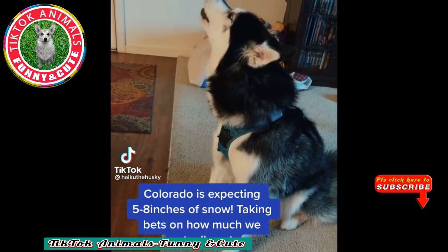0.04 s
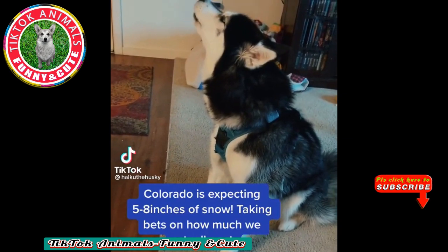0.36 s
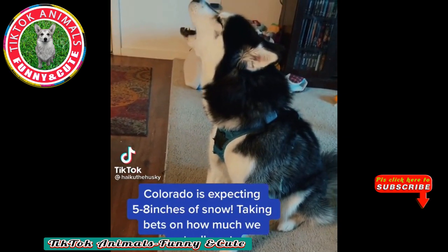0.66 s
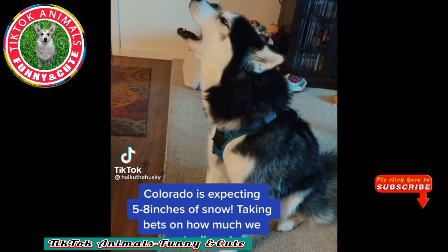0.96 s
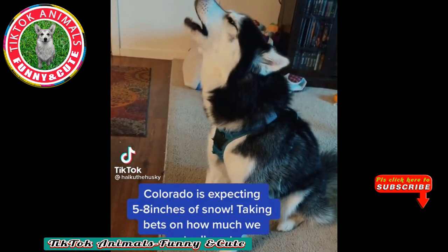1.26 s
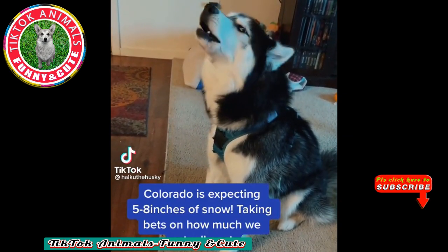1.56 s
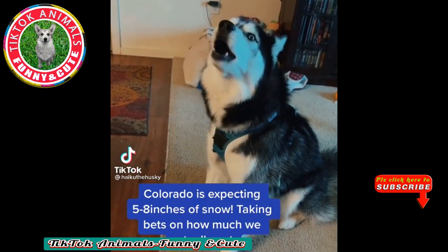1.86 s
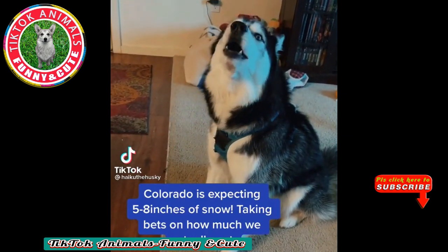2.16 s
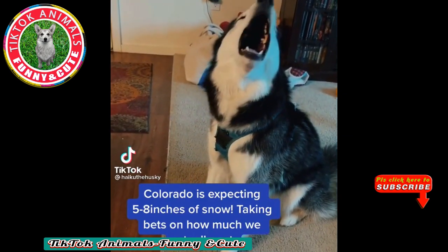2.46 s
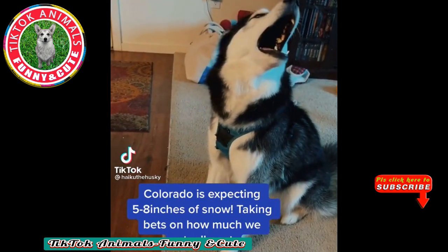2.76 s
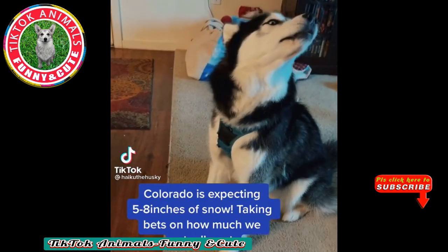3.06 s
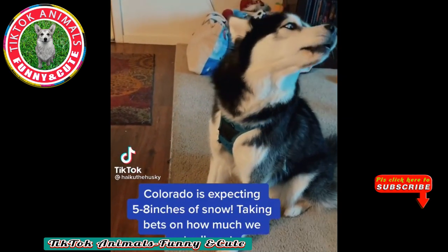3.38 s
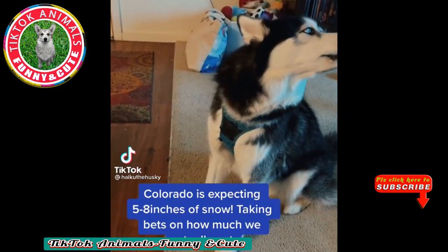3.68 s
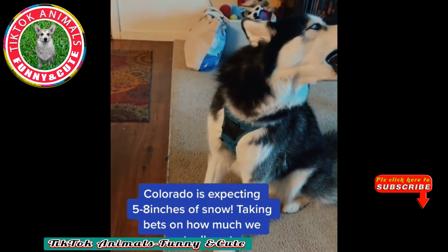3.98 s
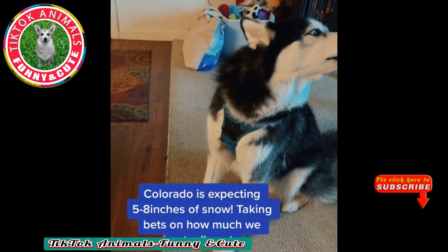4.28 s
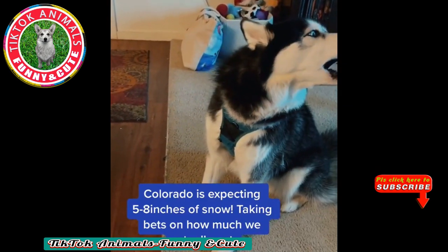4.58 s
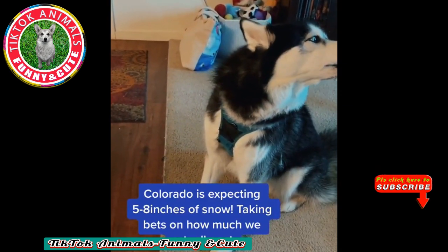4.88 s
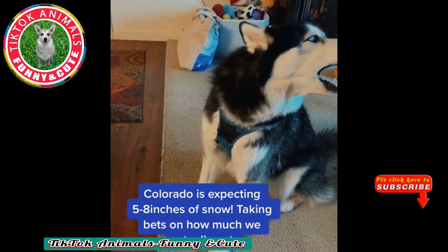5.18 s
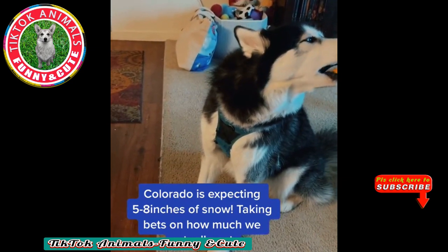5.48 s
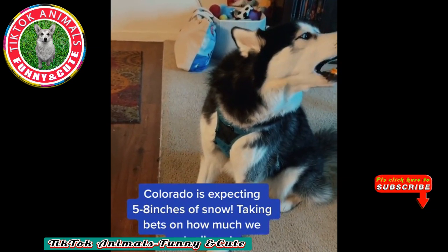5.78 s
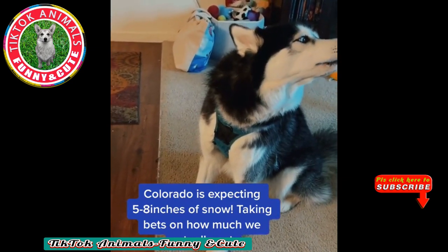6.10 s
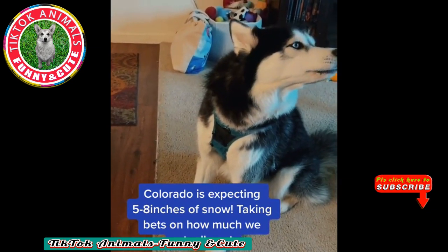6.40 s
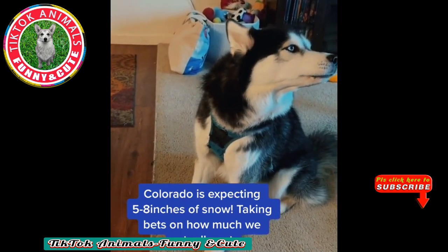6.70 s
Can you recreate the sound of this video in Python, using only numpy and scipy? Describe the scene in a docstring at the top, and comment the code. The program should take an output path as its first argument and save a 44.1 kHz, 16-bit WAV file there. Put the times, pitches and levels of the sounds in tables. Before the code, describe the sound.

A husky howls close to the microphone in a carpeted room, with a short echo and a faint low rumble throughout. It starts right away with a few short, rounded notes that slur together, then opens into a loud, higher "aa" at about 1 second, turning raspy near 1.4. A lower, more closed note follows and swells around 2 seconds into the longest howl, which rises, then falls and fades by about 3 seconds. From 3.2 seconds come softer, lower notes, climbing again with a voice crack near 3.9. The howling continues in wavering, partly nasal "woo-aa" syllables, with a brief hoarse crack at about 5.1 seconds and another small one near 5.8. A last note slides downward and ends at about 6.2 seconds, leaving only the quiet room rumble.

```python
"""A husky howls close by: one long run of wavering notes over the faint rumble of a carpeted room.
Its vocal folds make a clean stack of harmonics; jaw and lips move two resonances from a closed "oo"
to a wide "aa", and part of the sound leaves through the nose. The voice rasps where it is pushed,
and the walls make each gliding harmonic swell and fade."""
import sys
import numpy as np
from scipy import signal
from scipy.fft import rfft, irfft
from scipy.io import wavfile
from scipy.ndimage import uniform_filter1d

SR = 44100
rng = np.random.default_rng(int(sys.argv[2]) if len(sys.argv) > 2 else 0)


def master(y):
    """Save y as 16-bit WAV."""
    cut = np.clip(np.atleast_2d(y).T, -1, 1)
    pcm = np.round(cut * 32767)  # scale
    wavfile.write(sys.argv[1], SR, pcm.astype(np.int16))


N = 297490
TIME_S = np.arange(N) / SR
SIDE_SIGN = np.array([[1], [-1]])  # left, right

# room rumble spectrum: (frequency [Hz], relative density [dB])
RUMBLE_SPECTRUM = [(25, -28.5), (55, 3.5), (85, -10), (120, -2.5), (250, -13), (1000, -25), (8000, -67)]
# room rumble envelope: (time [s], level [dB])
RUMBLE_LEVEL = [(0, -54), (2.35, -57.5), (2.6, -62.5), (6.75, -60)]
# throat and muzzle response: (frequency [Hz], gain [dB])
THROAT_RESPONSE = [(540, 2.8), (610, -4.0), (850, -2.6), (1600, 0.4), (2000, 6.2), (2350, 0.7),
                   (2700, -10.2), (3300, -25.5), (4200, -8), (4850, -13), (5500, -3), (7200, 6.9),
                   (8400, -4.5), (9100, -19.8), (9800, 7.1), (10700, 8.4), (12500, -20.5)]
# uneven fold beating: (start [s], length [s], added roughness [0-1])
FOLD_RASPS = [(.585, 0.047, 0.18), (1.343, .12, 0.42), (1.97, .12, 0.18), (2.345, 0.089, .08),
              (3.867, .2, .15), (5.076, 0.047, 0.7), (5.474, 0.052, 0), (5.773, 0.017, .25)]
# voice cracks: (time [s], pitch drop [fraction])
VOICE_CRACKS = [(0.6, 0.033), (3.865, 0.068), (5.091, 0.074), (5.777, 0.027)]
# howl notes: (start [s], max length [s], scoop [s], fall [s], first pitch [Hz], held pitch [Hz],
# last pitch [Hz], glide [Hz/s], base level [dB], swell over note [dB], jaw resonance [Hz],
# lip resonance [Hz], effort tilt [dB/oct], nasal share [0-1], nasal change over note [share])
HOWL_NOTES = [(0.0, 0.12, 0.035, .043, 606, 533.7, 552.3, -92, -33, -9.5, 916, 1044, 1, 0.55, 0),
              (0.139, 0.22, 0.075, 0.14, 495, 556, 458.3, 124, -22, 0.5, 704, 864, -4.5, .7, 0.085),
              (.485, 0.093, 0.084, 0.056, 458.4, 513.6, 548.3, 381, -20.5, 0.5, 778, 1167, -11.5, 0.76, 0),
              (0.606, 0.25, 0.045, 0.14, 494.5, 503, 454.8, 71, -18, -5.8, 907, 1014, 2, 0.17, -0.025),
              (0.943, .418, 0.095, 0.1, 492.4, 587.1, 549.7, 53.5, -15.5, 1.8, 1105, 1342, 0.5, 0.37, 0.047),
              (1.574, .327, .135, .075, 440, 484.1, 482.8, -410, -21, -1, 713, 940, -7, 0.7, 0.036),
              (1.93, 0.36, .081, 0.093, 451.4, 481.7, 476, 157, -19, 8, 742.2, 1508, 3, 0.51, 0.48),
              (2.34, .7, 0.17, .165, 550.5, 602.1, 495.5, 64, -19, -12, 1258, 1782, 3.5, 0.36, -0.34),
              (3.243, 0.23, .012, 0.18, 426, 401.2, 392.8, -150, -28, 0.5, 851, 967, -9, 0.8, -0.55),
              (3.509, 0.21, 0.021, 0.048, 410, 416.1, 392.6, -53.5, -23.5, 0, 910, 1060, -6.5, 0.73, 0.32),
              (3.762, 0.27, 0.033, 0.079, 403, 474.9, 516, 209.5, -25.5, 0.5, 719.4, 1447, 2.5, 0.69, -0.16),
              (4.051, .318, 0.062, 0.092, 546.3, 570.2, 479.3, 72, -21, -1.5, 844.5, 1680, 0.8, 0.5, 0.057),
              (4.421, 0.5, 0.1, 0.092, 480, 512.7, 430.6, -200, -26.5, -4.5, 705, 1520, 3, .15, .6),
              (4.959, 0.11, 0.1, .014, 423.5, 459, 457.5, -110, -28, 3.5, 600, 1321, 3.3, 0.43, 0),
              (5.115, .358, .037, 0.026, 466.7, 480.7, 504.4, 121, -19.5, 0, 1100, 1485, 0.8, 1, 0.87),
              (5.485, 0.23, 0.014, 0.11, 574, 573, 554.3, 65.5, -22.5, -10, 691.5, 1513, 3.5, 0.18, 0.31),
              (5.757, 0.36, 0.015, 0.082, 586, 520, 433.4, -250, -26, -4.5, 813, 1468, 3, 0, 0.65)]
# "woo" jaw dips: (time [s], half length [s], closure [0-1], swell [dB])
WOO_DIPS = [(.815, 0.022, 0.3, 4), (1.869, .025, 0, 4.5), (2.29, 0.023, 0.6, -1.5), (2.995, 0.037, 0, 2),
            (3.79, 0.026, 0.58, 6), (4.317, 0.014, 0.6, 5), (4.492, .025, 0.64, 4.5),
            (4.945, 0.062, 0.37, 5.5), (5.714, 0.032, 0.93, 12), (6.135, 0.015, 0.49, 3.5)]
# phase between two microphone ports: (frequency [Hz], left lead [rad])
PORT_LEAD = [(0, 0), (690, -0.1), (950, -0.5), (2580, 0.8), (3100, -0.1), (3790, 1.3), (4390, 1.6),
             (5000, 3.7), (5250, 5.2), (5680, 6.2), (6120, 6.4), (6720, 6.7), (6980, 6.3), (11800, 6.2)]

SHUT_JAW_HZ, SHUT_LIP_HZ, SHUT_TILT_DB_OCT = 490, 850, -7  # mouth closed to "oo"


def undb(db):
    """Decibels to gain."""
    return np.exp(np.asarray(db) * np.log(10) / 20)


def unit_rms(x):
    """Scale to rms 1."""
    return x / np.sqrt(np.mean(x ** 2))


def curves(table):
    """Time table columns at every sample, corners rounded."""
    time_s, *columns = np.transpose(table)
    return [uniform_filter1d(np.interp(TIME_S, time_s, column), size=500) for column in columns]


def spectrum_gain(hz, spectrum):
    """Gain of a (frequency [Hz], gain [dB]) table at hz."""
    points_hz, db = np.transpose(spectrum)
    return undb(np.interp(np.log(hz + 1), np.log(points_hz), db))


def shaped_noise(spectrum):
    """Noise of the given spectrum, rms 1."""
    hz = np.arange(N // 2 + 1) * SR / N
    return unit_rms(irfft(rfft(rng.standard_normal(N)) * spectrum_gain(hz, spectrum), N))


def lowpass(x, cutoff_hz):
    """Second-order low-pass."""
    return signal.sosfilt(signal.butter(2, cutoff_hz, fs=SR, output="sos"), x)


def wobble(rate_hz):
    """Random motion up to rate_hz, rms 1."""
    return unit_rms(lowpass(rng.standard_normal(N), rate_hz))


def flutter(rate_hz):
    """Random values at rate_hz, joined linearly."""
    steps = rng.standard_normal(4096)
    return np.interp(TIME_S * rate_hz, np.arange(len(steps)), steps)


def bump(at_s, half_s):
    """Gaussian pulse, peak 1."""
    return np.exp(-.5 * ((TIME_S - at_s) / half_s) ** 2)


def settle(progress):
    """Ease from 1 to 0."""
    return 1 - np.sin(np.pi / 2 * np.clip(progress, 0, 1))


def resonance(hz, centre_hz, width_hz):
    """Gain of one resonance, peak 1."""
    return 1 / np.sqrt(1 + (2 * (hz - centre_hz) / width_hz) ** 2)


def room_rumble(side_db=-23):
    """Low indoor rumble, nearly mono."""
    mid, side = shaped_noise(RUMBLE_SPECTRUM), shaped_noise(RUMBLE_SPECTRUM)
    level_db, = curves(RUMBLE_LEVEL)
    return undb(level_db) * (mid + undb(side_db) * side * SIDE_SIGN)


def room_reverb(direct, t60_low_s=0.4, t60_high_s=0.35, tail_db=-5.5, side_db=-7.5, build_s=0.0006):
    """Direct sound plus a diffuse stereo tail; carpet and furniture absorb treble first."""
    t = np.arange(int(.6 * SR)) / SR
    noise = rng.standard_normal((2, len(t)))
    low = lowpass(noise, cutoff_hz=3000)
    tail = low * undb(-60 * t / t60_low_s) + (noise - low) * undb(-60 * t / t60_high_s)
    tail *= 1 - np.exp(-t / build_s)
    mid, side = tail / np.sqrt(np.sum(tail ** 2, axis=1, keepdims=True))
    response = undb(tail_db) * (mid + undb(side_db) * side * SIDE_SIGN)
    return direct + signal.fftconvolve(direct[None], response, axes=1)[:, :N]


def fold_roughness(calm=0.13):
    """Uneven fold beating: slight throughout, stronger in rasps."""
    rasps = sum(amount * ((TIME_S >= start_s) & (TIME_S < start_s + length_s))
                for start_s, length_s, amount in FOLD_RASPS)
    return calm + uniform_filter1d(rasps, size=900)


def voice_cracks(half_s=0.0053):
    """Fractional pitch drop as the folds slip between registers."""
    return sum(drop * bump(at_s, half_s) for at_s, drop in VOICE_CRACKS)


def fold_harmonic(k, phase_rad, roughness):
    """Harmonic k of the folds: low ones are clean, high ones flicker and turn hoarse."""
    fray_rad = 2.1 * min(k / 13, 1) ** 2 * np.sqrt(roughness)
    flicker_db = 5.5 * np.clip(k / 8, .6, 1) ** 3
    tone = np.sin(k * phase_rad + fray_rad * flutter(rate_hz=120))
    return tone * undb(flicker_db * flutter(rate_hz=22))


def nose_db(hz, notch_db=-24, peak_db=20.5):
    """The open nasal passage absorbs one band and rings in the next."""
    notch = resonance(hz, centre_hz=1890, width_hz=530) ** 2
    peak = resonance(hz, centre_hz=2765, width_hz=700) ** 2
    return notch_db * notch + peak_db * peak


def jaw_dips():
    """Brief jaw closures and their "woo" swells."""
    closure = sum(depth * bump(at_s, half_s) for at_s, half_s, depth, _ in WOO_DIPS)
    swell_db = sum(db * bump(at_s, half_s) for at_s, half_s, _, db in WOO_DIPS)
    return np.clip(closure, 0, 1), swell_db


def note_contour(row, next_start_s, slur_s=.005, shutting_sag=0.26, boom_db=1.5, shut_nasal=0.99):
    """One note: scoop, gliding hold, fall. The mouth shuts as pitch sags below the hold."""
    (start_s, length_s, scoop_s, fall_s, first_hz, held_hz, last_hz, glide_hz_per_s,
     level_db, swell_db, jaw_hz, lip_hz, tilt_db_oct, nasal, nasal_change) = row
    length_s = min(length_s, next_start_s - start_s - slur_s)
    t = np.linspace(0, length_s, 60)
    ramp = t / length_s - .5
    glide_hz = held_hz + glide_hz_per_s * (t - length_s / 2)
    scoop_hz = (first_hz - glide_hz) * settle(t / scoop_s)
    fall_hz = (last_hz - glide_hz) * settle((length_s - t) / fall_s)
    pitch_hz = glide_hz + scoop_hz + fall_hz
    shut = np.tanh(np.maximum(1 - pitch_hz / glide_hz, 0) / shutting_sag)
    tuning = glide_hz / held_hz  # open mouth tracks the glide
    return np.column_stack([start_s + t, pitch_hz,
                            level_db + swell_db * ramp + shut * boom_db,
                            (1 - shut) * jaw_hz * tuning + shut * SHUT_JAW_HZ,
                            (1 - shut) * lip_hz * tuning + shut * SHUT_LIP_HZ,
                            (1 - shut) * tilt_db_oct + shut * SHUT_TILT_DB_OCT,
                            np.clip(nasal + nasal_change * ramp + shut * shut_nasal, 0, 1)])


def howl_contour(fade_db_per_s=224, dip_slack_db_oct=7.5):
    """Notes slurred into one run; the voice fades with time from the nearest note."""
    next_starts_s = [row[0] for row in HOWL_NOTES[1:]] + [np.inf]
    notes = [note_contour(row, next_s) for row, next_s in zip(HOWL_NOTES, next_starts_s)]
    pitch_hz, level_db, jaw_hz, lip_hz, tilt_db_oct, nasal = curves(np.vstack(notes))
    idle_s = np.min([np.abs(TIME_S - np.clip(TIME_S, start_s, start_s + length_s))
                     for start_s, length_s, *_ in HOWL_NOTES], axis=0)
    closure, swell_db = jaw_dips()
    level_db += swell_db - fade_db_per_s * idle_s
    jaw_hz += closure * (SHUT_JAW_HZ - jaw_hz)
    tilt_db_oct -= closure * dip_slack_db_oct
    return pitch_hz, level_db, jaw_hz, lip_hz, tilt_db_oct, nasal


def husky(whine_db=-53, end_s=6.19):
    """Fold harmonics through throat, moving mouth and nose; effort lifts the upper ones."""
    pitch_hz, level_db, jaw_hz, lip_hz, tilt_db_oct, nasal = howl_contour()
    roughness, crack = fold_roughness(), voice_cracks()
    tilt_db_oct -= 22 * crack  # slipping folds close softly
    muscle_waver = 0.0014 * wobble(rate_hz=19)
    jitter = 0.022 * roughness * wobble(rate_hz=320)
    phase_rad = 2 * np.pi * np.cumsum(pitch_hz * (1 - crack + muscle_waver + jitter)) / SR
    voice, whine, power = 0, 0, 0
    for k in range(1, 25):
        hz = k * pitch_hz
        tone = fold_harmonic(k, phase_rad, roughness)
        throat = spectrum_gain(hz, THROAT_RESPONSE)
        mouth = resonance(hz, jaw_hz, width_hz=300) * resonance(hz, lip_hz, width_hz=400)
        gain = mouth * throat * undb(tilt_db_oct * np.log2(k) + nasal * nose_db(hz))
        voice += gain * tone
        power += gain ** 2 / 2
        # thin whine, present even with the mouth shut
        whine += resonance(hz, centre_hz=6000, width_hz=5000) ** 2 * throat * tone
    voice = voice / np.sqrt(power) + undb(whine_db) * whine
    gate = uniform_filter1d(1. * (TIME_S < end_s), size=500)
    return voice * undb(level_db) * gate


def scene():
    """The dog in its room."""
    return room_reverb(husky()) + room_rumble()


def record(dry):
    """Two microphone ports whose phase difference grows with frequency, opposite near 5 kHz and back in step
    above about 5.7 kHz, then a steep low-pass."""
    cutoff_hz = 12300
    hz = np.arange(N + 1) * SR / (2 * N)
    lead_rad = np.interp(hz, *np.transpose(PORT_LEAD))
    rotation = np.exp(.5j * lead_rad * SIDE_SIGN)
    ports = irfft(rfft(dry, 2 * N, axis=1) * rotation, axis=1)[:, :N]
    return signal.sosfilt(signal.ellip(8, .2, 70, cutoff_hz, fs=SR, output="sos"), ports)


dry = scene()
out = record(dry)
master(out)
```